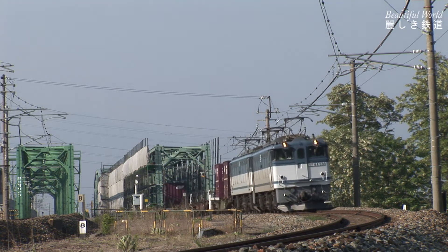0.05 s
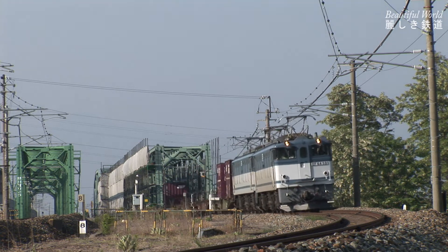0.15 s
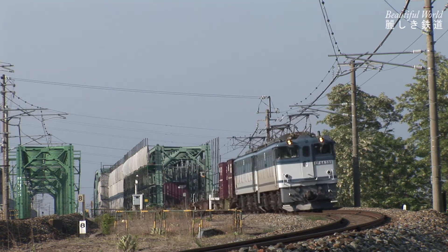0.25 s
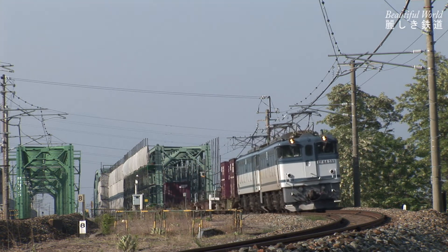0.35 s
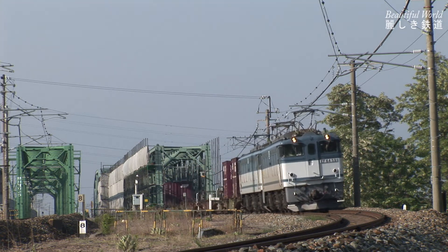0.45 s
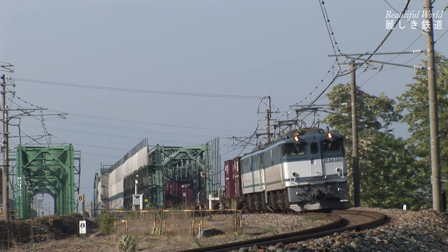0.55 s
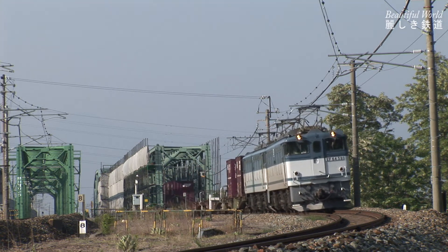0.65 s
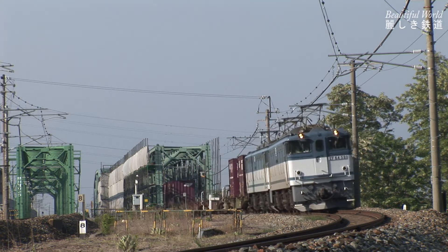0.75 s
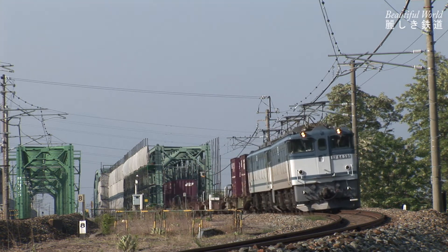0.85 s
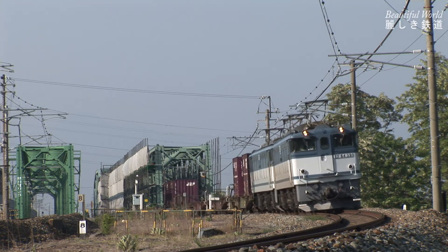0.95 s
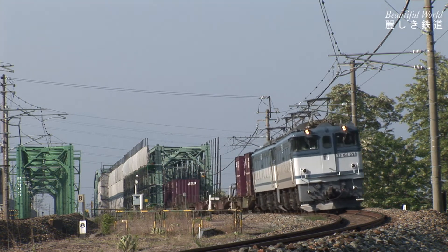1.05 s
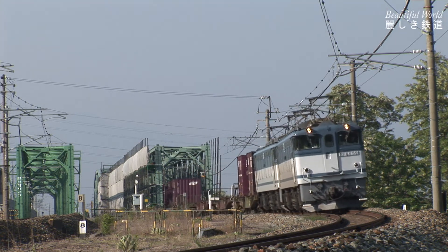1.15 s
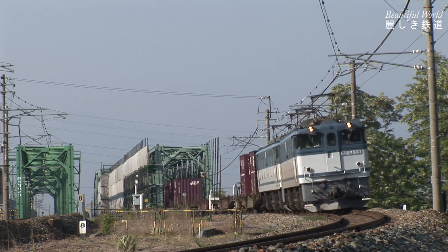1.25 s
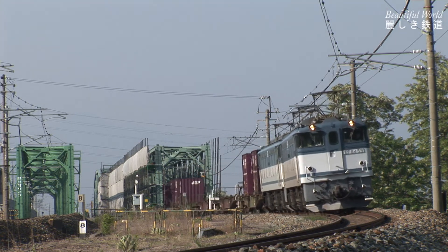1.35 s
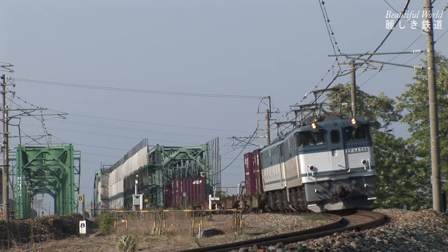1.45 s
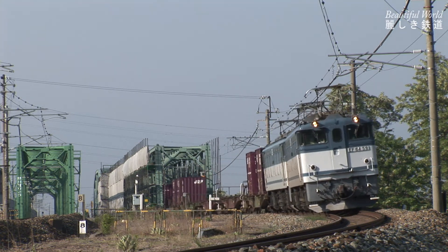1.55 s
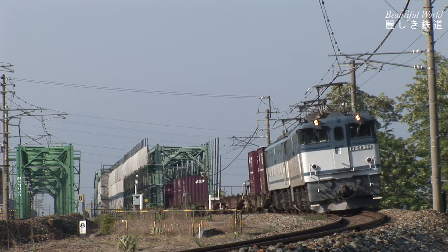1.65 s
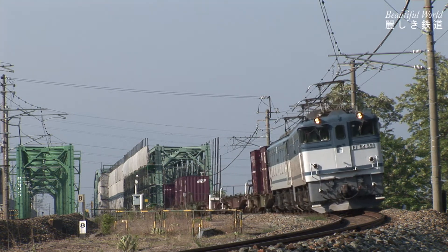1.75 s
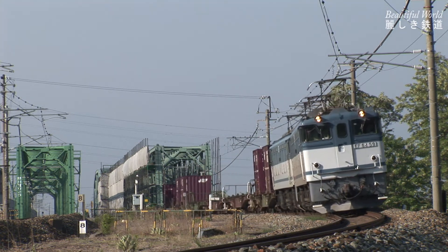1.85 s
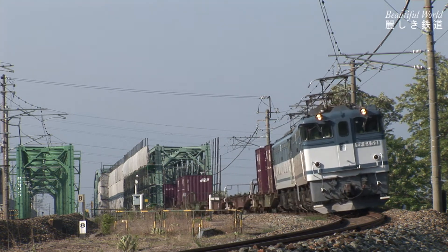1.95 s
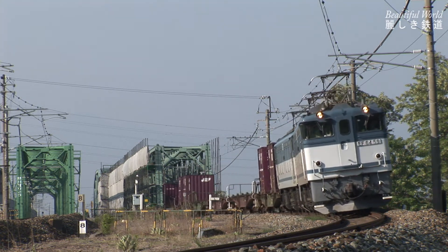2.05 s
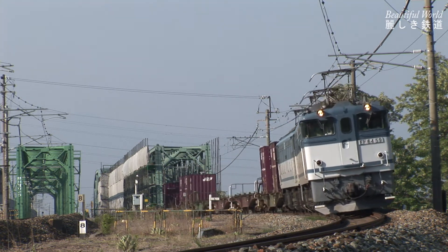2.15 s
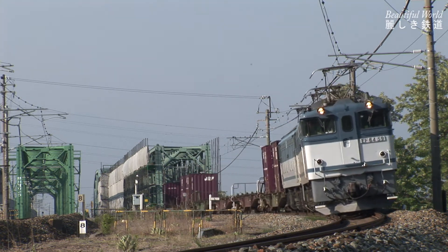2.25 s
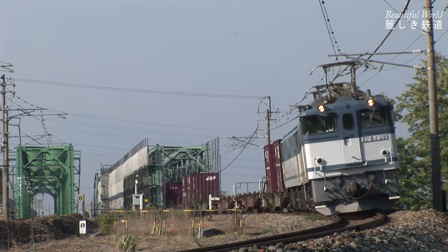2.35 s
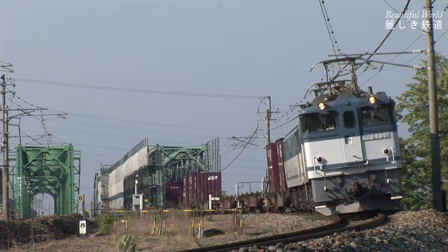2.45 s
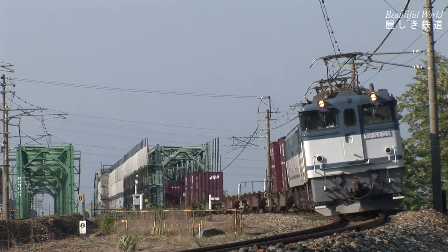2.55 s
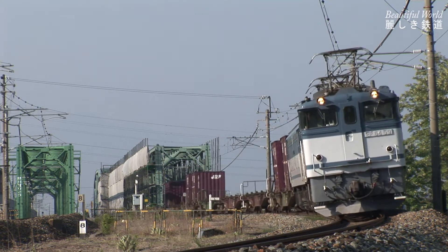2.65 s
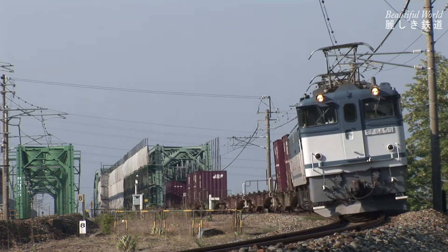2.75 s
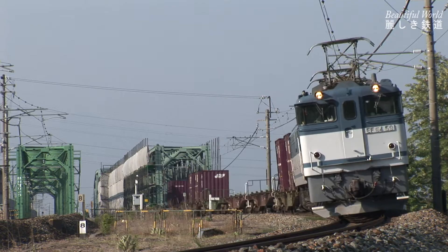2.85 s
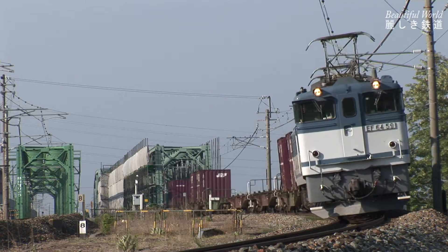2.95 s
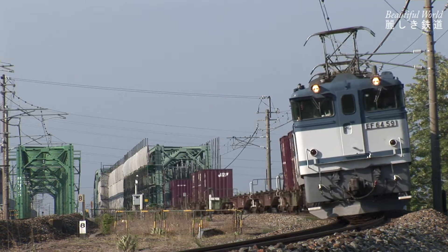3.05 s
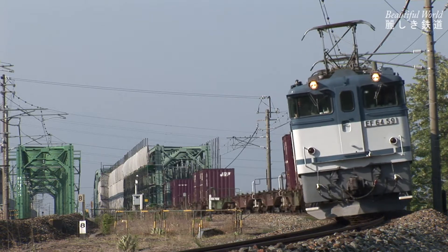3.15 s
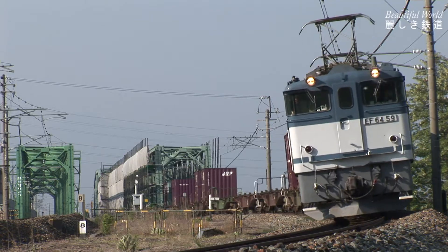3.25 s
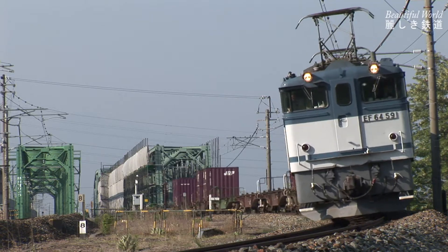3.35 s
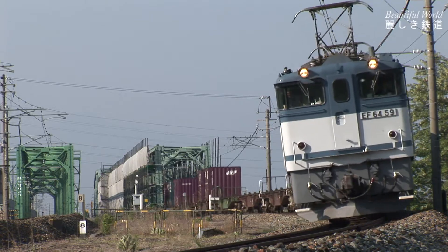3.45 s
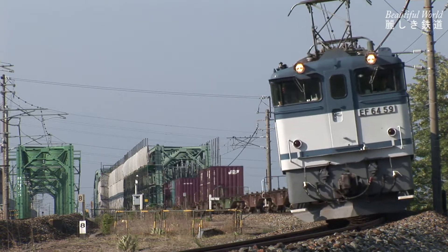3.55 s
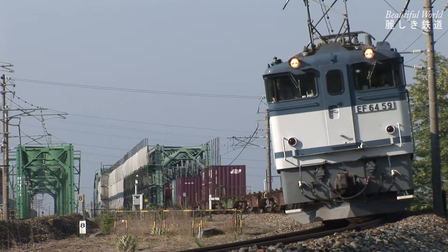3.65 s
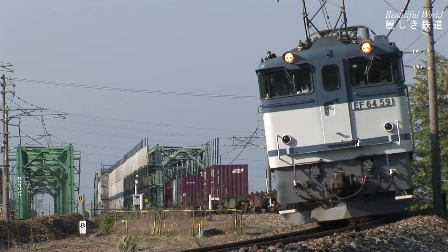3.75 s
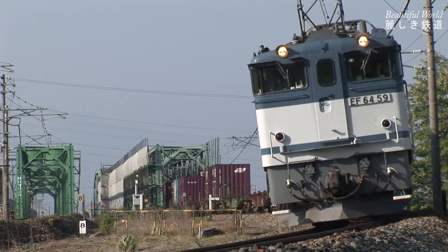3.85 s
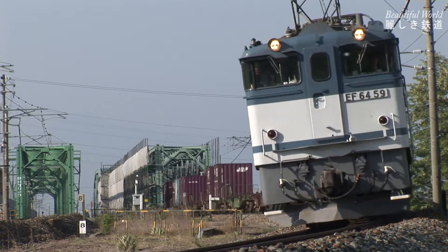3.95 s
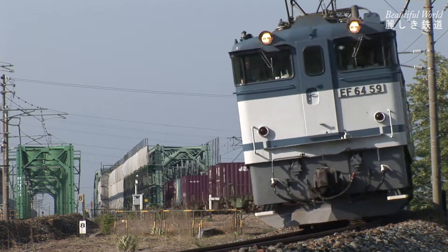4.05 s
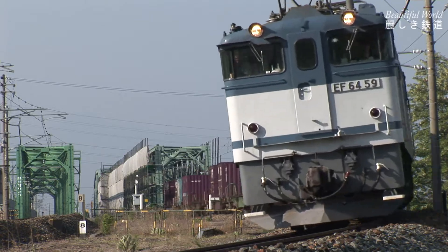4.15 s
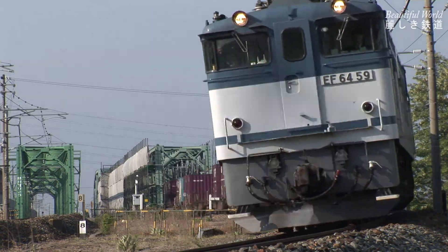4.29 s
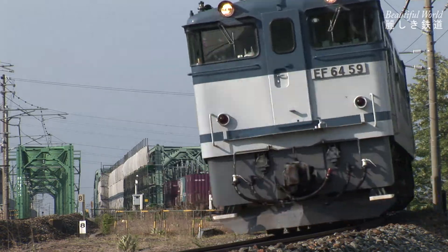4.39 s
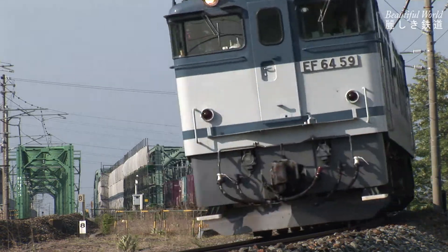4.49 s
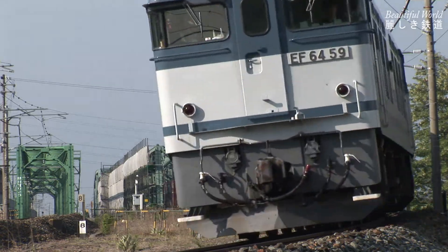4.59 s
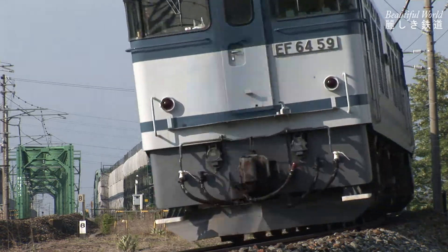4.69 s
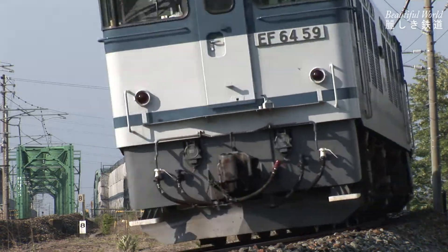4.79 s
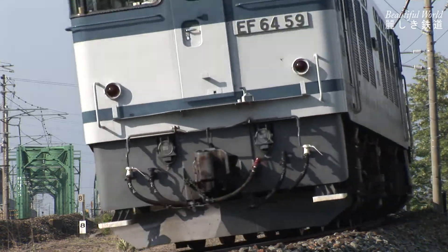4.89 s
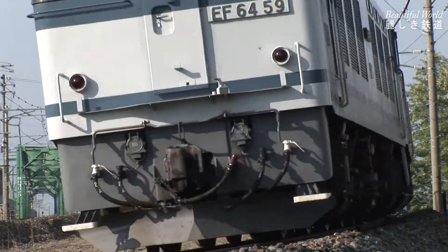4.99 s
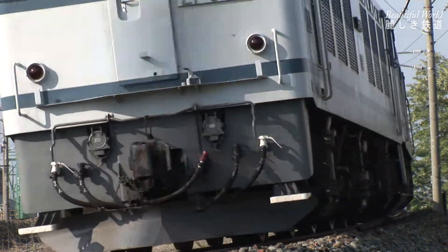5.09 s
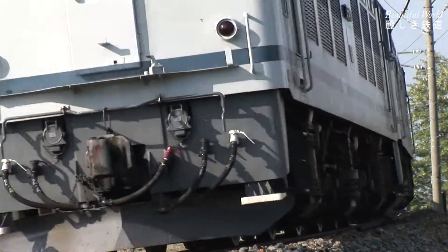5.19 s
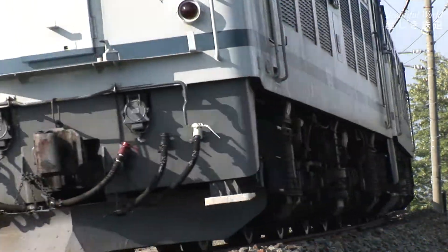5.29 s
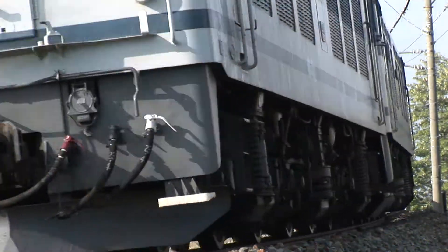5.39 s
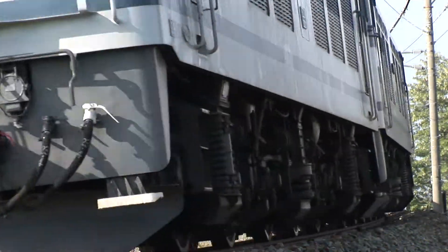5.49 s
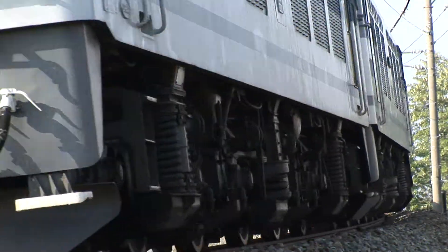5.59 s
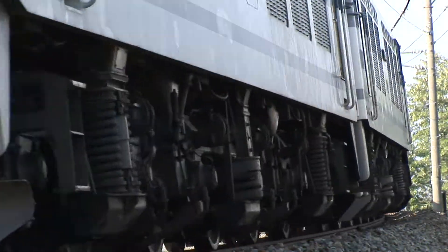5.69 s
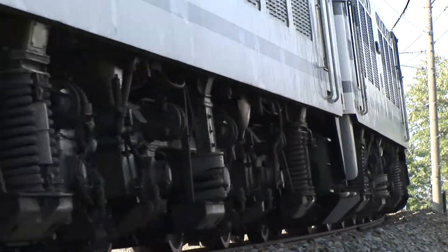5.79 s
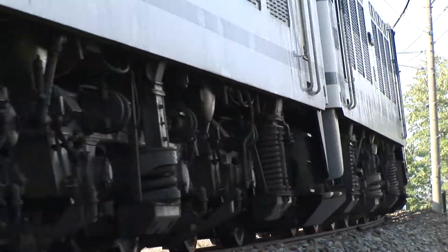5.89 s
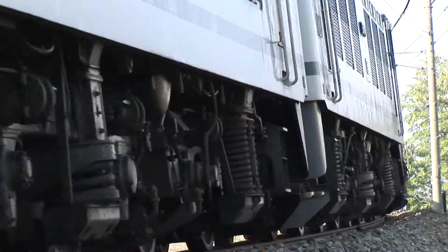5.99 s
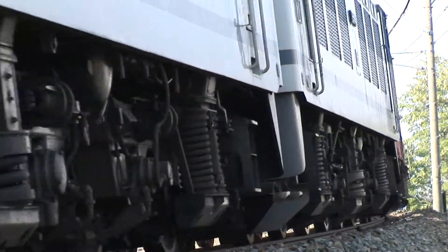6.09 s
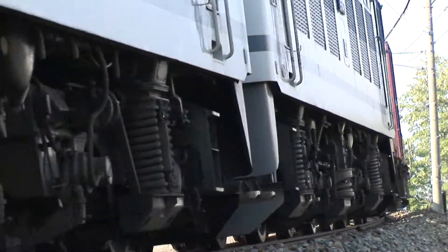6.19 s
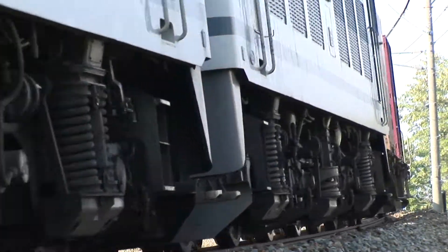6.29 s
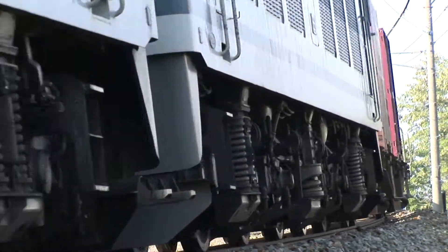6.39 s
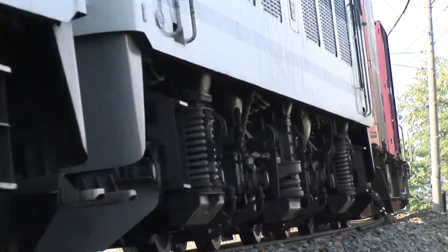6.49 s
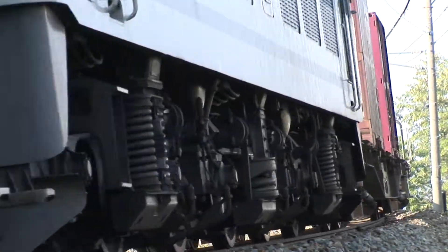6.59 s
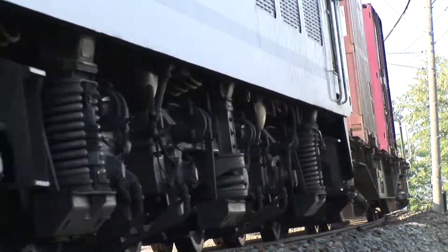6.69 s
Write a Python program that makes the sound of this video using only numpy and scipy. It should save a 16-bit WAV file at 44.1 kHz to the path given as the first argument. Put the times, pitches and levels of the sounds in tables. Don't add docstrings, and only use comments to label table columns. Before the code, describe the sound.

A freight train approaches on a bend, heard by a small trackside stereo microphone with faint hiss and light wind. Rolling roar, low bridge hum and rough gear hum swell; high wheel squeals come and go over bird chirps and a quick shutter rattle. Near the end wheels slam a joint, the frame booms, and air blasts in growing gusts as the locomotive passes very close.

```python
import sys
import numpy as np
from scipy import signal
from scipy.fft import rfft, irfft, next_fast_len
from scipy.io import wavfile
from scipy.ndimage import uniform_filter1d

SR = 44100
rng = np.random.default_rng(int(sys.argv[2]) if len(sys.argv) > 2 else 0)


def to_wav(s):
    ch = np.atleast_2d(s).T
    pcm = np.round(np.clip(ch, -1, 1) * 32767)
    wavfile.write(sys.argv[1], SR, pcm.astype(np.int16))


def decibels_to_gain(level_db):
    exponent = np.asarray(level_db, float) / 20
    return 10 ** exponent


N = 296793
T = np.arange(N) / SR
SIZE = next_fast_len(N)
HZ = np.fft.rfftfreq(SIZE, 1 / SR)
JOINT_S, ABEAM_S = 5.889, 6.698

# pitch_hz, mid_db (per Hz), side_db (per Hz), alike (side like mid,
# -1..1), lagging (the same a quarter cycle off)
NEAR_SPECTRUM = [(25, -66, -84, -0.16, -0.23), (45, -48, -82, -0.24, -0.11), (60, -47.5, -87, -0.36, -0.09),
                 (90, -48.5, -89, -0.23, -0.13), (140, -51.0, -79, -0.33, 0.1), (203, -43.5, -63, -0.9, 0.38),
                 (258, -46.0, -58, -0.58, 0.54), (326, -44.5, -56.4, -0.4, 0.36), (397, -49, -53, -0.4, 0.57),
                 (483, -54.5, -58, -0.1, 0.66), (615, -54.5, -58.0, -0.1, 0.53),
                 (690, -57.5, -57.5, 0.35, 0.63), (940, -55.5, -57.5, 0.52, 0.31),
                 (1310, -60.5, -62.5, 0.6, 0.18),
                 (1750, -55.5, -60, 0.63, 0.28), (2300, -54, -62.8, 0.38, 0.2),
               (2940, -55.5, -74, 0.14, 0.23), (3200, -59.5, -74.0, 0.07, 0.2),
               (3900, -58.5, -61, -0.41, 0.32), (4540, -72.5, -63, 0.05, 0.22),
               (4800, -59.5, -66.3, 0.35, 0.2), (5570, -70, -60.0, 0.3, -0.19),
               (6000, -74, -59, -0.043, -0.11), (7000, -79.5, -71.0, -0.01, -0.09),
               (8360, -72, -62, 0.56, -0.14), (10200, -65.5, -70, 0.34, -0.28),
               (12400, -61.0, -64, 0.78, -0.06), (14900, -56.5, -59.5, 0.51, 0.48)]
NEAR_COLOUR = NEAR_SPECTRUM


def curve(rows):
    s, *columns = np.transpose(rows)
    return np.array([np.interp(T, s, c) for c in columns])


def noise():
    return rfft(rng.standard_normal(SIZE))


def walk(rate):
    hold = int(SR / rate)
    steps = np.repeat(rng.standard_normal(N // hold + 1), hold)
    return 1.3 * uniform_filter1d(uniform_filter1d(steps, hold), hold)[:N]


def ports(colour):
    # pitch_hz, gain_db
    port_peak = [(13800, 0), (14600, 2), (15100, -3), (15800, -6)]
    hz, *columns = np.transpose(colour)
    mid_db, side_db, alike, lagging = (np.interp(np.log(HZ + 1), np.log(hz), c) for c in columns)
    shared = noise()
    fresh = np.sqrt(np.clip(1 - alike ** 2 - lagging ** 2, 0, 1))
    side = (alike + 1j * lagging) * shared + fresh * noise()
    low_cut = np.clip(HZ / 22, 0, 1) ** 4
    capsule = decibels_to_gain(np.interp(HZ, *np.transpose(port_peak)))
    return np.array([decibels_to_gain(mid_db) * shared, decibels_to_gain(side_db) * side]) * low_cut * capsule


def layers(colour, ranges_hz):
    both, edges = ports(colour), np.log(np.ravel(ranges_hz))
    for k, (lo, hi) in enumerate(ranges_hz):
        own = np.repeat(np.arange(len(ranges_hz)) == k, 2)
        share = np.interp(np.log(HZ + 1), edges, own)
        power = 2 * np.sum(np.abs(both[0, (HZ > lo) & (HZ < hi)]) ** 2) / SIZE ** 2
        yield irfft(both * share / np.sqrt(power), SIZE)[:, :N]


def bursts(rows, rise_s):
    total = 0
    for s, db, t60_s in rows:
        rise = np.clip((T - s) / rise_s, 0, 1)
        total = total + decibels_to_gain(db) * rise * decibels_to_gain(-60 * np.clip(T - s, 0, None) / t60_s)
    return total


def ring(hz, width_hz):
    wobble = irfft(noise() / (1 + (2 * (HZ - hz) / width_hz) ** 2), SIZE)[:N]
    return wobble / wobble.std()


def nearness():
    return 20 * np.log10((ABEAM_S - JOINT_S) / (ABEAM_S - np.minimum(T, JOINT_S)))


def far_levels():
    # level_db (at the joint), follow (dB per dB of nearness)
    far_mix = [
        (-34.5, 0.81),
        (-35, 0.78),
        (-33, 1.0),
        (-46.5, 0.93),
    ]
    # middle_s, gain_db, half_width_s
    rubs = [(2.45, 1, 0.17), (3.57, 5.5, 0.17), (3.69, 3.5, 0.033), (3.87, -3, .15), (4.5, 4, 0.29),
            (5.12, 3.5, .05), (5.48, 2, 0.092), (5.75, 0.5, 0.17)]
    rub_shares = [
        0.01,
        .1,
        .35,
        1.0,
    ]
    clears_s, clearing_s = 1.95, .35
    air_loss_db_per_s, screen_hiss_db, screen_rumble_db = 4, -13, -2
    db, follow = np.transpose(far_mix)[:, :, None]
    rub = sum(gain_db * np.exp(-((T - s) / width_s) ** 2) for s, gain_db, width_s in rubs)
    levels = db + follow * nearness() + np.array(rub_shares)[:, None] * rub
    screened = np.clip((clears_s - T) / clearing_s + .5, 0, 1)
    levels[3] += air_loss_db_per_s * np.minimum(T - JOINT_S, 0) + screen_hiss_db * screened
    levels[0] += screen_rumble_db * screened
    return levels


def approach():
    # pitch_hz, mid_db, side_db (per Hz), alike, lagging (-1..1)
    far_spectrum = [(25, -68.5, -102.5, 0.06, 0.0), (45, -59.5, -101.1, 0.06, 0.02),
                    (61, -55, -101.5, 0.05, -0.09), (88, -61.5, -102.9, 0.08, -0.07),
                    (139, -63.5, -104.0, 0.06, -0.35), (190, -69.0, -88.5, -0.19, 0.09),
                    (257, -67.5, -83.2, -0.22, -0.03), (313, -64.5, -78, -0.28, -0.09),
                    (423, -69.5, -78, -0.01, -0.06), (495, -72.0, -77.5, -0.1, 0.02),
                    (610, -70.5, -75.2, -0.22, -0.23), (694, -73.5, -77, -0.066, -0.16),
                    (910, -72.0, -76.0, 0.08, 0.02), (1310, -76.0, -80.0, 0.18, 0.04),
                    (1640, -74.0, -80, 0.072, -0.04), (2260, -71.0, -82.5, 0.062, 0.01),
                  (2880, -73.0, -92.0, -0.06, -0.05), (3160, -76.5, -93, 0.04, -0.01),
                  (3815, -76.5, -83.5, -0.0061, -0.13), (4560, -90.5, -84.3, -0.11, 0.15),
                  (4960, -81.5, -92, -0.11, 0.01), (5470, -93.5, -83, 0.25, 0.18),
                  (7150, -103.5, -93.5, 0.11, -0.02), (7100, -106.7, -104.0, 0.03, -0.16),
                  (8450, -100.5, -92, -0.055, -0.02), (10300, -95, -108.6, -0.39, -0.05),
                  (12600, -96, -95, 0.38, -0.1), (15300, -93, -97, 0.63, 0.39)]
    # from_hz, to_hz
    far_ranges = [
        (25, 120),
        (200, 1200),
        (1400, 3900),
        (8000, 15500),
    ]
    # start_s, level_db, t60_s
    knocks = [(.03, -46, 0.34), (2.08, -50, .6), (2.4, -56, 0.23), (2.8, -49, 0.34), (3.22, -48, 0.36),
              (3.67, -48, 0.18), (4.1, -41, .3), (4.77, -41, .3), (5.25, -47, 0.23), (5.47, -37, 0.21),
              (5.71, -34, 0.28)]
    knock_roar_db = -16
    flutter_db = np.array([[1.2], [.8], [.5], [.8]]) * [walk(rate) for rate in (4.7, 9, 11, 10)]
    gains = decibels_to_gain(far_levels() + flutter_db)
    gains[:2] += decibels_to_gain(np.array([[0], [knock_roar_db]])) * bursts(knocks, rise_s=.02)
    rolling = sum(g * x for g, x in zip(gains, layers(far_spectrum, far_ranges)))
    return rolling * np.clip((JOINT_S + 0.0074 - T) / 0.016, 0, 1)


def bridge():
    # time_s, level_db
    boom = [(0, -60), (1.2, -62), (3.2, -65), (4.2, -68), (5.88, -62)]
    hum = decibels_to_gain(curve(boom)[0]) * ring(346, width_hz=26)
    return np.array([hum, .2 * hum])


def gears():
    # time_s, pitch_hz
    gear_pitch = [(0, 325), (2.5, 310), (3.8, 302), (4.03, 296), (4.5, 312), (4.7, 304), (5.85, 297)]
    # multiple, level_db
    gear_orders = [(1, 1), (2, 2), (3, -3)]
    slip_s, slip_db, slip_width_s = 4.25, 6.5, .3
    db = -50 + .8 * nearness() + slip_db * np.exp(-((T - slip_s) / slip_width_s) ** 2)
    turn = 2 * np.pi * np.cumsum(curve(gear_pitch)[0] * (1 + .011 * walk(20))) / SR
    hum = sum(decibels_to_gain(db + rel_db + 4 * walk(11)) * np.sin(k * turn) for k, rel_db in gear_orders)
    hum = hum * (T < JOINT_S)
    return np.array([hum, 0.19 * hum])


def flanges():
    # start_s, length_s, level_db
    squeals = [(.9, .55, -78), (1.85, .22, -71), (2.33, .42, -69), (2.85, .22, -66), (3.1, .65, -63),
               (4.05, .12, -68), (4.22, .34, -60), (4.64, .12, -62), (4.88, 0.49, -57), (5.22, .55, -56)]
    # pitch_hz, side_db, mid_db
    wheel_modes = [(3951, -12, -18), (6782, -13, -40), (7019, -17, -40), (8807, -18, -22), (9313, -16, -19),
                   (10583, -32, -19), (11186, -27, -19), (11832, -22, -19), (13016, -20, -18),
                   (13501, -19, -17), (14653, -17, -15)]
    squeal_hz, edge_s, idle_db = 6085, .04, -80
    bite = decibels_to_gain(idle_db)
    for s, length_s, db in squeals:
        bite = bite + decibels_to_gain(db) * np.clip(np.minimum(T - s, s + length_s - T) / edge_s, 0, 1)
    flicker = decibels_to_gain(3 * walk(12) + 2 * walk(25))
    turn = 2 * np.pi * np.cumsum(squeal_hz + 6 * walk(15)) / SR
    squeal = bite * flicker * np.sqrt(2) * np.sin(turn)
    sung = 0
    for hz, side_db, mid_db in wheel_modes:
        sung = sung + decibels_to_gain(np.array([[mid_db], [side_db]]) + 3.8 * walk(6.5)) * ring(hz, width_hz=14.3)
    return np.array([.01 * squeal, squeal]) + sung * decibels_to_gain(far_levels()[3] - 2)


def whistle(hz, db, start_s, end_s):
    turn = 2 * np.pi * np.cumsum(uniform_filter1d(hz, size=200)) / SR
    gate = np.clip(np.minimum(T - start_s, end_s - T) / .004, 0, 1)
    return decibels_to_gain(db) * gate * (np.sin(turn) + .045 * np.sin(2 * turn))


def birds():
    # peak_s, peak_hz, bend (of the climb), level_db
    hooks = [(.14, 4500, 2, -77), (1.722, 4300, .5, -67), (2.458, 4850, 1.7, -64), (2.725, 4850, 1.7, -64)]
    # start_s, from_hz, to_hz, level_db, length_s
    flicks = [(.88, 6300, 5400, -76, .025), (1.972, 3600, 7200, -70, .078), (2.905, 4000, 7200, -68, .075)]
    hook_from_hz, rise_s, fall_s, fall_hz_per_s = 3950, .077, .03, 31000
    song = 0
    for s, top_hz, bend, db in hooks:
        climb = np.clip(1 + (T - s) / rise_s, 0, 1)
        after = np.clip(T - s, 0, fall_s)
        hz = hook_from_hz + (top_hz - hook_from_hz) * climb ** bend - fall_hz_per_s * after
        swell_db = db - 8 * (1 - climb) ** 2 - 5 * after / fall_s
        song = song + whistle(hz, swell_db, s - rise_s, s + fall_s)
    for s, from_hz, to_hz, db, length_s in flicks:
        part = np.clip((T - s) / length_s, 0, 1)
        hz = to_hz + (from_hz - to_hz) * (.65 * np.exp(-part / .09) + .35 * np.exp(-part / .6))
        fade_db = db - 50 * np.clip(.2 - part, 0, 1) - 34 * np.clip(part - .2, 0, 1)
        song = song + whistle(hz, fade_db, s, s + length_s)
    return np.array([-1.6 * song, 3.6 * song])


def microphone_floor():
    self_noise_db, wind_db = -70.5, -76.5
    hiss = irfft(np.array([noise(), noise()]) * (.35 + 1 / (1 + (HZ / 5500) ** 4)), SIZE)[:, :N]
    breeze = irfft(noise() / (1 + (HZ / 110) ** 4) * np.clip(HZ / 25, 0, 1), SIZE)[:N]
    wind = decibels_to_gain(wind_db + 0.97 * walk(1.9)) * breeze / breeze.std()
    return decibels_to_gain(self_noise_db) * hiss + np.array([[0], [1]]) * wind


def shutter():
    # start_s, level_db, t60_s
    clacks = [(2.172, -45, 0.11), (2.198, -57, .12), (2.236, -48, 0.11), (2.266, -52, .08),
              (2.281, -50, .08), (2.313, -41.5, 0.11), (2.340, -60, .16)]
    from_hz, to_hz, side_db, tick_db = 2500, 6000, 2, -73
    spectrum = ports(NEAR_COLOUR) + decibels_to_gain(tick_db) * noise() * [[1], [0]]
    spectrum = spectrum * np.clip(HZ / from_hz, 0, 1) ** 2 / (1 + (HZ / to_hz) ** 2)
    rattle = irfft(spectrum, SIZE)[:, :N] * decibels_to_gain(np.array([[0], [side_db]]))
    return rattle / rattle[0].std() * bursts(clacks, rise_s=.003)


def alongside():
    # from_hz, to_hz
    near_ranges = [
        (25, 150),
        (170, 450),
        (520, 1250),
        (1450, 5500),
        (8000, 15500),
    ]
    # level_db (at the nearest), follow (dB per dB of nearness)
    near_mix = [
        (-26, .45),
        (-20, 1.25),
        (-25, .9),
        (-19.5, 1.0),
    ]
    # time_s, level_db
    bogies = [(5.895, -11), (5.92, -7), (6.02, -9), (6.06, -4.5), (6.18, -6.5), (6.31, -2.5), (6.46, 0),
              (6.6, -1), (6.73, -4)]
    # start_s, level_db, t60_s
    joint_hits = [(5.888, -23, 0.14), (5.908, -25, 0.15), (6.052, -26.5, 0.2)]
    # pitch_hz, width_hz, level_db, late_s
    frame_modes = [(55, 12, -40, 0.015), (199, 13, -35, -0.069), (289, 15, -26.5, 0.091),
                   (405, 28, -27, -0.1)]
    # start_s, level_db, t60_s
    spits = [(5.889, -42, 0.073), (5.899, -30, 0.05), (5.939, -26, 0.19), (6.003, -28, 0.071),
             (6.054, -25, .082), (6.077, -29, 0.11), (6.232, -32, 0.21), (6.288, -33, 0.096),
             (6.393, -36, .091), (6.497, -23, 0.12), (6.64, -30, 0.19), (6.695, -22.5, 0.22)]
    valve_s, frame_lag_s, frame_follow = 5.939, 0.041, 1.26
    *body, jet = layers(NEAR_COLOUR, near_ranges)
    body[3] = body[3] * decibels_to_gain(np.vstack([0 * T, -7 + 12 * (T - JOINT_S)]))
    arrived = np.clip((T - JOINT_S) / .001, 0, 1)
    db, follow = np.transpose(near_mix)[:, :, None]
    levels = db + follow * curve(bogies)
    levels[0] += -41 * np.clip(T - 6.48, 0, None)
    roar = sum(g * x for g, x in zip(decibels_to_gain(levels + 1.27 * walk(40)), body))
    bang = .45 * body[0] + .5 * body[1] + body[2] + 0.29 * body[3]
    hits = bang * bursts(joint_hits, rise_s=0.002)
    boom = 0
    for hz, width_hz, mode_db, late_s in frame_modes:
        near_db = np.interp(T - late_s - frame_lag_s, *np.transpose(bogies))
        boom = boom + decibels_to_gain(mode_db + frame_follow * near_db) * ring(hz, width_hz)
    gust_db = -34 + 16 * (T - valve_s) + 1.0 * walk(30) + 2 * walk(150)
    blow = decibels_to_gain(gust_db) * np.clip((T - valve_s) / .003, 0, 1)
    air = jet * (blow + decibels_to_gain(-41) * arrived + bursts(spits, rise_s=.004))
    return (roar + np.array([[1], [-.15]]) * boom) * arrived + hits + air


def scene():
    train = approach() + bridge() + gears() + flanges() + alongside()
    mid, side = train + birds() + microphone_floor() + shutter()
    return np.array([mid + side, mid - side])


def drop_faint_top(x):
    # from_hz, to_hz, keep_db (silent below this)
    top_bands = [(13650, 14400, -92.5), (14400, 15150, -85), (15150, 15800, -72), (15800, 22050, 0)]
    hz, _, frames = signal.stft(x, SR, nperseg=1024)
    for lo, hi, keep_db in top_bands:
        band = (hz >= lo) & (hz < hi)
        power = uniform_filter1d(np.mean(np.abs(frames[:, band]) ** 2, axis=(0, 1)), size=3)
        frames[:, band] *= power > decibels_to_gain(keep_db) ** 2
    return signal.istft(frames, SR, nperseg=1024)[1][:, :N]


def roll_off(x):
    return signal.sosfilt(signal.butter(12, 16370, fs=SR, output="sos"), x)


def record(dry):
    clipped = np.clip(dry, -1, 1)
    return roll_off(drop_faint_top(clipped))


dry = scene()
out = record(dry)
to_wav(out)
```